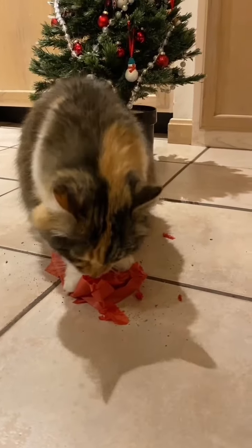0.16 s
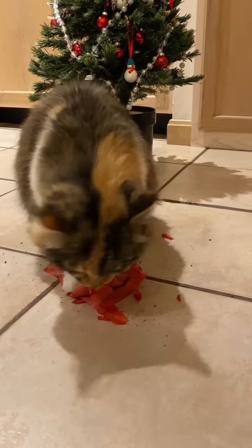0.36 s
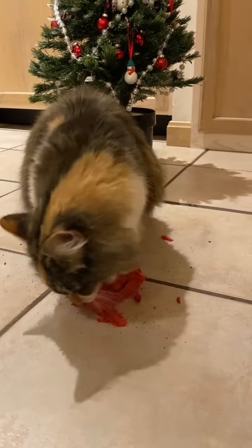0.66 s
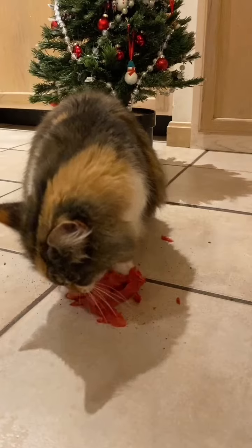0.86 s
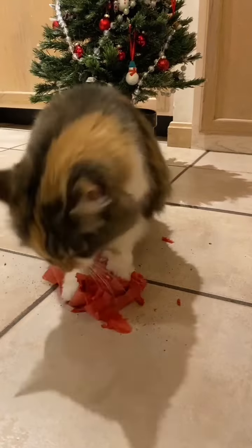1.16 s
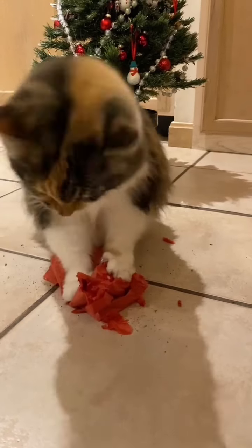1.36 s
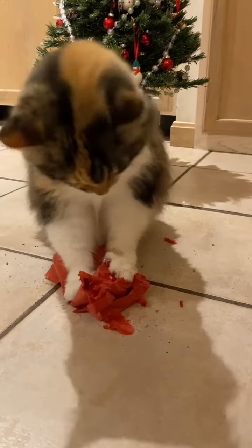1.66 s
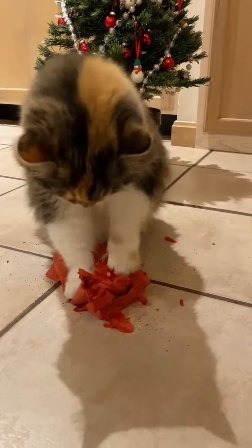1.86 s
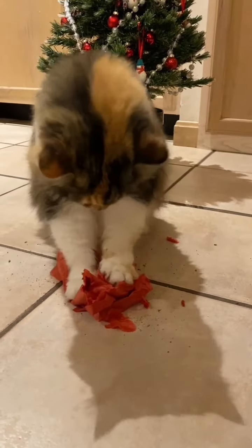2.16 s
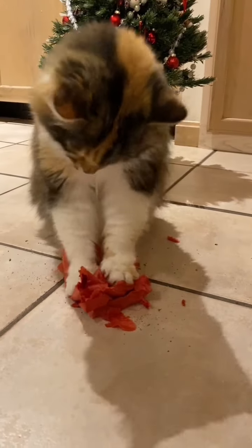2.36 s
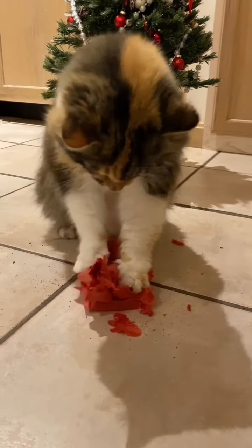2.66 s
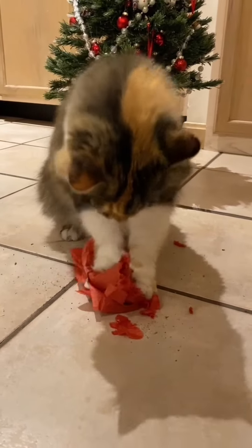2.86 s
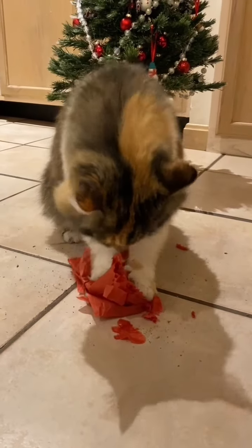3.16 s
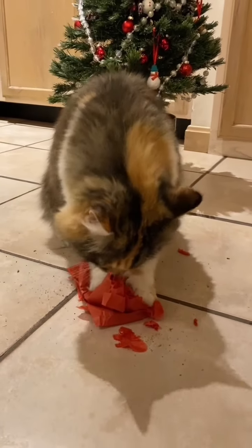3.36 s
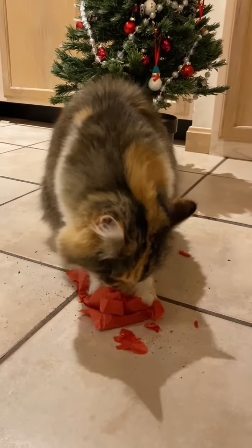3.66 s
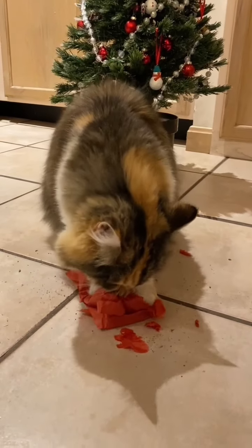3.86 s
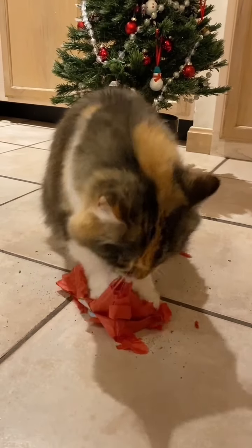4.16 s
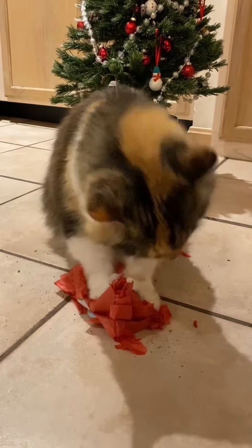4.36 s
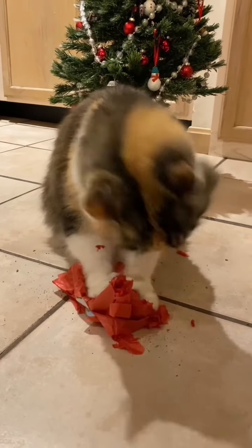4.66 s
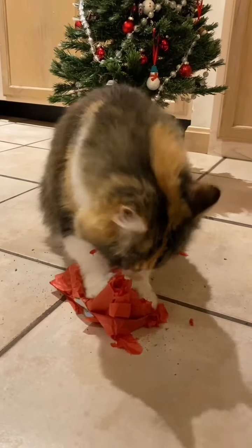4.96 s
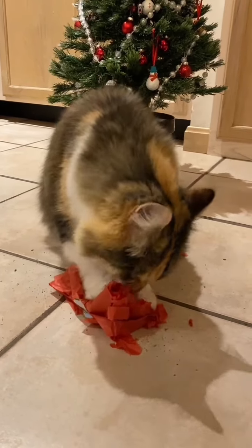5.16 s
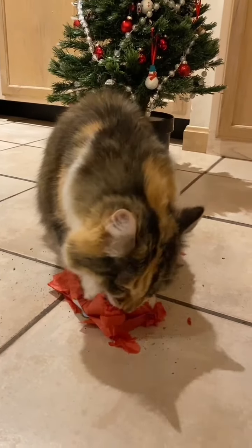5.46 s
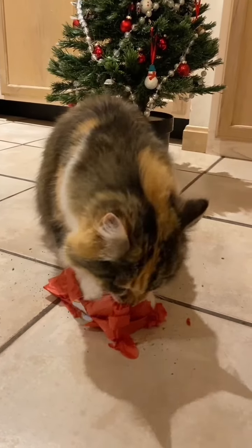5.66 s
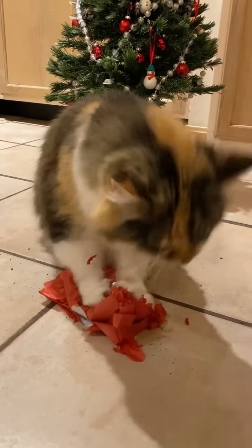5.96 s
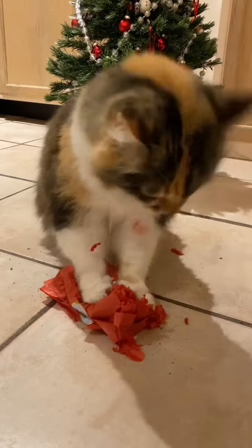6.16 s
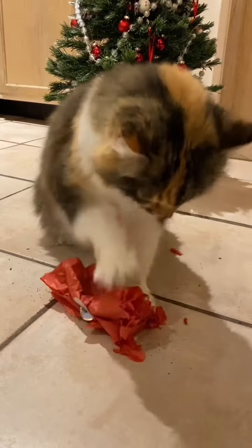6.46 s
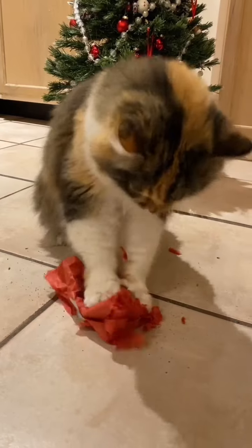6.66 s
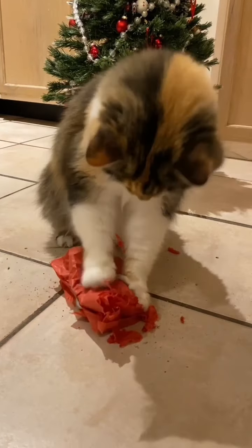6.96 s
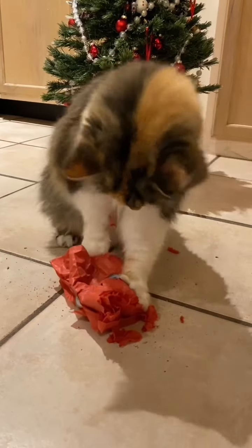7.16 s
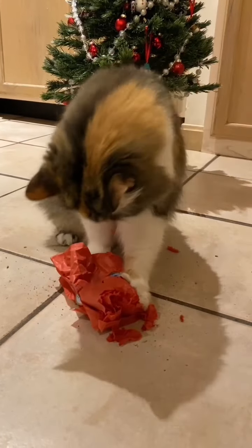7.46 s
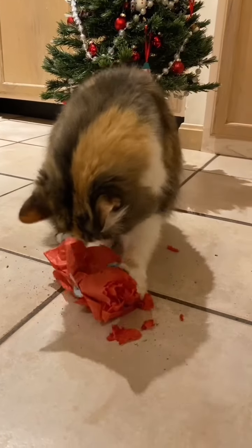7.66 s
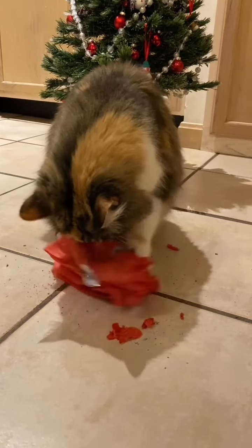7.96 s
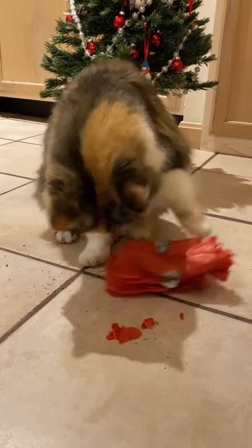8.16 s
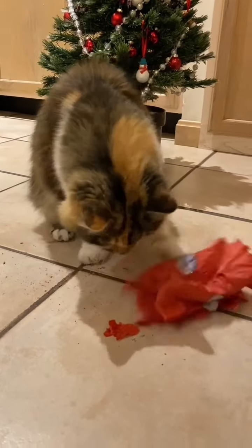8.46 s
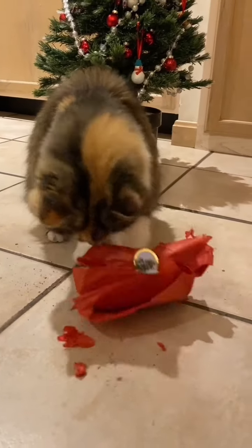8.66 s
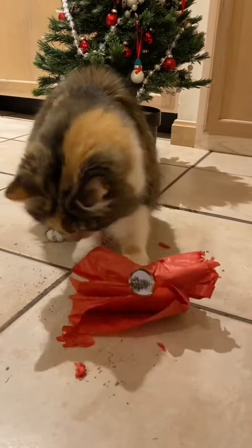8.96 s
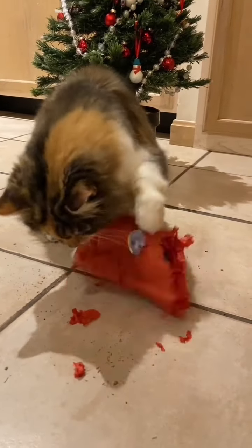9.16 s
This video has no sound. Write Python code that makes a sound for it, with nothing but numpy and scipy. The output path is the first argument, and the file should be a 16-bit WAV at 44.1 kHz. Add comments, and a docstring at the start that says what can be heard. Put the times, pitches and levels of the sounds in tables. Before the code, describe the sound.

Close, dry handling of thin crisp paper in a small tiled room. Irregular fine crackle and isolated crease snaps alternate with brief, loud, jerky rips and a few hollow pops. Quiet stretches leave only tiny ticks over soft household rumble. Padded thumps mark the hardest pulls. In the last two seconds the paper slides over the floor in several short rough swishes with light crackling.

```python
"""A cat kneads, bites and tears a small tissue-paper parcel on a tiled floor, near a camera, for 9.3 s.
From 0 s: low rumble with faint hum, and crinkling facets under resting and stroking paws; creases snap
as short rings with sharp edges, pockets pop with falling pitch, and soft bumps knock on the tiles.
Bites from 0.6, 3.6, 5.4 and 5.8 s swell; rips from 0.9 s are bursts of stick-slip plucks and fibre crackle.
From 7.5 s the parcel slides as grainy hiss. A short diffuse room response follows each paper sound."""
import sys
import numpy as np
from scipy import signal
from scipy.fft import rfft, irfft, next_fast_len
from scipy.io import wavfile
from scipy.ndimage import map_coordinates

SR = 44100
rng = np.random.default_rng(int(sys.argv[2]) if len(sys.argv) > 2 else 0)


def master(y):
    """Save y as 16-bit WAV."""
    cut = np.clip(np.atleast_2d(y).T, -1, 1)
    pcm = np.round(cut * 32767)  # scale
    wavfile.write(sys.argv[1], SR, pcm.astype(np.int16))


N = 411007

# Table levels are ahead of later gains and filters.
# pressed-wad spectrum: f/Hz, relative density/dB
WAD_SPECTRUM = [(80, -30), (200, -1), (480, -2.5), (650, 2.5), (900, -1), (1500, 0.5), (2200, -6),
                (4000, -23)]

WAD_DB = -1.5  # added to the wad in every push
ATTACK_DB_PER_S, RELEASE_DB_PER_S, SLIDE_ATTACK_DB_PER_S = 447, 230, 1500


def amp(db):
    """Decibels to gain."""
    return 10 ** (np.asarray(db) / 20)


def unit(x):
    """Scale to rms 1."""
    return x / np.sqrt(np.mean(x ** 2) + 1e-20)


def along(points, hz):
    """Read (f/Hz, value) points on a log-frequency axis."""
    f, v = np.transpose(points)
    return np.interp(np.log(hz + 1), np.log(f + 1), v)


def wobble(knots_per_s):
    """Smooth random curve through normally distributed knots."""
    knots = rng.standard_normal(int(N * knots_per_s / SR) + 4)
    return map_coordinates(knots, [np.arange(N) * knots_per_s / SR])


def filtered(x, response):
    """Apply a complex response of frequency."""
    size = next_fast_len(N + SR // 2)
    return irfft(rfft(x, size) * response(np.fft.rfftfreq(size, 1 / SR)), size)[..., :N]


def coloured(x, spectrum):
    """Causal minimum-phase filter of unit energy with the given spectrum shape."""
    size = 2048
    cepstrum = irfft(np.log(amp(along(spectrum, np.fft.rfftfreq(size, 1 / SR)))))
    # fold onto positive time
    cepstrum[1:size // 2] *= 2
    cepstrum[size // 2 + 1:] = 0
    pulse = irfft(np.exp(rfft(cepstrum)))
    return signal.oaconvolve(x, pulse / np.linalg.norm(pulse))[:N]


def diffuse(pair):
    """Two unrelated signals as close-set ports hear them: alike in the bass."""
    # stereo width: f/Hz, side minus mid/dB
    width = [(60, -39), (140, -28), (280, -9), (550, -2), (1000, 0.5), (1800, -11), (2800, -0.5),
             (6000, 16.5)]
    turn = lambda hz: np.arctan(amp(along(width, hz)))
    mid, side = filtered(pair, lambda hz: np.array([np.cos(turn(hz)), np.sin(turn(hz))]))
    return np.array([mid + side, mid - side])


def add(track, s, sound):
    """Mix a sound into the track at time s."""
    part = track[max(round(s * SR), 0):][:len(sound)]
    part += sound[:len(part)]


def crackle(rate_per_s, spread_db):
    """Random impulses of uneven size, scaled to mean power 1."""
    sizes = rng.choice([-1, 1], N) * amp(spread_db * np.clip(rng.standard_normal(N), -2, 2))
    return unit((rng.random(N) < rate_per_s / SR) * sizes / np.sqrt(rate_per_s))


def room_tone(rumble_db=-51.0, swing_db=0.7):
    """Household rumble and hiss, with a faint hum wavering in pitch and level."""
    # background spectrum: f/Hz, relative density/dB
    rumble = [(15, -41), (30, -9.5), (48, -4.5), (75, 1.5), (115, -4), (170, -4.5), (260, -16),
              (450, -19.5), (700, -23.5), (1200, -33.5), (3000, -37), (6000, -42), (10000, -77),
              (15500, -77)]
    # appliance hum: f/Hz, rms level/dB
    hum_lines = [(120, -72), (290, -70), (431, -73)]
    noise = rng.standard_normal((2, N))
    air = unit(diffuse(filtered(noise, lambda hz: amp(along(rumble, hz)))))
    t = np.arange(N) / SR
    waver_db, waver_rad = 3.5, 1.48
    hum = 0
    for hz, db in hum_lines:
        tone = np.sin(2 * np.pi * hz * t + waver_rad * wobble(9))
        hum = hum + amp(db) * unit(amp(waver_db * wobble(6.4)) * tone)
    return amp(rumble_db + swing_db * wobble(9)) * air + hum


def clock():
    """Times of the push-level curves, 1 ms apart."""
    return np.arange(0, N / SR, .001)


def held(t, s, length, attack_db_per_s):
    """Attack, hold and release of one push on the paper, in dB."""
    attack = -attack_db_per_s * np.maximum(s - t, 0)
    return attack - RELEASE_DB_PER_S * np.maximum(t - s - length, 0)


def strokes(table, attack_db_per_s):
    """One push per row: (level curve dB, wad offset dB, treble offset dB)."""
    t = clock()
    pushes = []
    for s, length, db, swell_db, wad_db, treble_db in table:
        swell = swell_db * (np.clip((t - s) / length, 0, 1) - .5)
        pushes.append((db + swell + held(t, s, length, attack_db_per_s), wad_db, treble_db))
    return pushes


def kneading():
    """Pushes that crinkle the paper: resting paws, strokes, and bites mounting to a final tug."""
    # paws press or shove: t/s, length/s, level/dB, swell over the stroke/dB,
    # wad offset from loose sheet/dB, treble offset from loose sheet/dB
    paw_strokes = [(0.352, 0.024, -51.5, 1, 4.5, -4.5), (0.493, 0.072, -57, 9, 7, -5),
                   (0.862, 0.079, -48, 4, 8.5, -3), (1.02, 0.017, -43.5, -2, 9.5, -10),
                   (1.142, 0.18, -62, -5.5, -11, -2), (1.452, 0.18, -64, -3, -16, -18),
                   (1.793, 0.072, -50, 9.5, -1, -6), (1.981, 0.27, -52, -1.5, -2.5, -4.5),
                   (2.294, 0.19, -55.5, -0.5, -3.5, -25), (2.466, 0.18, -43.5, 0, -2, -4.5),
                   (2.679, 0.041, -37.5, -2.5, -3, -1), (2.74, 0.044, -47, 2, -2, -8),
                   (2.813, 0.039, -40.5, 6, 1, 0), (2.89, 0.065, -49.5, 6.5, -4.5, -5),
                   (3.02, 0.16, -56, -1, -1.5, -7), (3.141, 0.042, -47.5, 0, 1.5, -5),
                   (3.227, 0.15, -50, -0.5, -3.5, -6.5), (3.397, 0.18, -54.5, 5.5, 1, -6.5),
                   (3.846, .1, -55, -3, 2, -7), (3.958, 0.092, -47.5, 16, 6, -2),
                   (4.359, 0.023, -57.5, -4, 0, 0.5), (4.458, 0.1, -57.5, -4, -1.5, -4.5),
                   (4.69, .13, -59, 0, 0.5, -9), (4.975, 0.19, -66, 16, 4, -6),
                   (5.22, 0.13, -56, 3.5, 3.5, -5.5), (5.6, 0.067, -47, 4, 6, 2),
                   (5.72, 0.015, -44, -3.5, 1, 1), (5.847, .26, -56.5, 9.5, 0.5, -3),
                   (6.255, 0.053, -49, 8.5, 1, -3.5), (6.398, 0.044, -66, 13, 0, -10),
                   (6.495, 0.033, -47, 2.5, 2, 0.5), (6.565, 0.076, -45.5, 5.5, -3, -3.5),
                   (6.789, 0.18, -55, 11.5, -1, -5), (7.12, 0.094, -53.5, 2, -2.5, -2.5),
                   (7.368, 0.19, -61, 11, -5.5, -3), (8.468, 0.028, -45, 1, 1.5, 0),
                   (8.538, 0.042, -43, 3, -6, 0), (9.072, 0.073, -47.5, 2.5, 0.5, .5),
                   (9.27, 0.039, -40, 4.5, 1.5, -1.5)]
    # teeth grip and pull: t/s, length/s, level at the grip/dB, gain by the final tug/dB
    bites = [(0.571, 0.52, -49, 10), (3.625, 0.48, -51.5, 15.5), (5.379, 0.28, -54, 7),
             (5.782, 0.051, -48.5, 8.5)]
    rest_db, rest_wad_db, rest_treble_db, fidget_db = -68.5, 1, 0.5, 2.5
    tug_s, bite_wad_db, bite_treble_db = 0.12, 4, -1.5
    t = clock()
    fidget = np.interp(t, np.arange(N) / SR, wobble(10))
    pushes = [(rest_db + fidget_db * fidget, rest_wad_db, rest_treble_db)]
    pushes += strokes(paw_strokes, ATTACK_DB_PER_S)
    for s, length, db, tug_db in bites:
        tug = tug_db * np.exp(np.minimum(t - s - length, 0) / tug_s)
        level = db + tug + held(t, s, length, ATTACK_DB_PER_S)
        pushes.append((level, bite_wad_db, bite_treble_db))
    return pushes


def summed(pushes):
    """Levels in dB of loose sheet, pressed wad and sheet treble; pushes add in power."""
    sheet = sum(amp(level) ** 2 for level, _, _ in pushes)
    wad = sum(amp(level + wad_db + WAD_DB) ** 2 for level, wad_db, _ in pushes)
    treble = sum(amp(level + treble_db) ** 2 for level, _, treble_db in pushes)
    t = np.arange(N) / SR
    return [np.interp(t, clock(), 10 * np.log10(power + 1e-20)) for power in (sheet, wad, treble)]


def blend(sheet, wad, levels):
    """Colour the loose sheet and pressed wad, and play them at their levels."""
    # loose-sheet spectrum: f/Hz, relative density/dB
    sheet_spectrum = [(500, -20.5), (1300, -6.5), (2100, 1), (2700, -1), (3300, 2.5), (4400, -1), (5500, 1),
                      (8000, -4.5), (11000, -5.5), (15500, -13)]
    treble_hz = 5200  # the finest wrinkles sound above this
    sheet_db, wad_db, treble_db = levels
    sheet = coloured(unit(sheet), sheet_spectrum)
    fine = filtered(sheet, lambda hz: hz ** 4 / (hz ** 4 + treble_hz ** 4))
    pressed = coloured(unit(wad), WAD_SPECTRUM)
    return amp(sheet_db) * (sheet - fine) + amp(treble_db) * fine + amp(wad_db) * pressed


def facets(rate, spread_db, sharpness):
    """Facets of many sizes buckle independently and ring briefly; small ones are most numerous."""
    out = np.zeros(N)
    for hz in 400 * 2 ** (np.arange(11) / 2):
        buckles = crackle(rate * (1 + (hz / 3500) ** 2), spread_db)
        out += np.sqrt(hz) * signal.lfilter(*signal.iirpeak(hz, max(sharpness, 1), SR), buckles)
    return unit(out)


def flurries(rate_per_s, life_s):
    """Power of mean 1 that jumps at random moments and decays exponentially."""
    jumps = crackle(rate_per_s, spread_db=4) ** 2
    power = signal.lfilter([1], [1, -np.exp(-1 / (life_s * SR))], jumps)
    return power / power.mean()


def handling(gain_db=0, slide=0.76, slide_grows=0.046):
    """Harder kneading buckles more facets a second; a light touch leaves separate crackles."""
    flurries_per_s, flurry_s, flurry_share = 110, .0014, .36  # share of crinkle power
    levels = summed(kneading())
    rate = 105 * amp(.65 * (levels[0] + 55.5))
    # sheet sliding on sheet thins below -67 dB
    hiss = slide * amp(slide_grows * np.minimum(levels[0] + 67.0, 0))
    # paper catches and lets go
    catching = np.sqrt(1 - flurry_share + flurry_share * flurries(flurries_per_s, flurry_s))
    sheet = facets(rate, spread_db=5, sharpness=4) + hiss * rng.standard_normal(N)
    sheet += 0.72 * crackle(5 * rate, spread_db=-1.5)
    wad = facets(rate, spread_db=8.0, sharpness=2.7) + 0.63 * hiss * rng.standard_normal(N)
    return amp(gain_db) * catching * blend(sheet, wad, levels)


def ticks():
    """Faint creases settling at random, as rows like those of the louder snaps."""
    ticks_per_s, tick_db, spread_db = 24, -54, 5
    tick_hz, spread_octaves, edge_re_peak_db = 2780, 0.8, -10
    count = int(ticks_per_s * N / SR)
    when, size, pitch = rng.random((count, 3)).T
    db = tick_db + spread_db * (2 * size - 1)
    hz = tick_hz * 2 ** (spread_octaves * (2 * pitch - 1))
    return list(zip(when * N / SR, db, hz, db + edge_re_peak_db))


def snaps(edge_life_s=0.0011, edge_gain_db=-5, facet_gain_db=4.5, count=4):
    """A crease flips: a facet swells and rings, its edge cracks, and neighbouring facets follow."""
    # louder creases: t/s, facet level/dB, f/Hz, edge level/dB
    loud_snaps = [(0.033, -41.5, 3140, -57), (0.082, -42, 2430, -60), (0.2014, -36, 2400, -57),
                  (.258, -49, 3000, -58), (0.2864, -65, 5900, -48), (0.375, -38, 1540, -44),
                  (0.465, -55, 2990, -55), (.4985, -45, 1400, -62), (0.533, -52, 5230, -43),
                  (.581, -48, 5000, -40), (.599, -38, 1900, -39), (.647, -29, 1000, -39),
                  (0.67, -45, 5940, -44), (0.7306, -52, 5500, -45), (0.8335, -32, 1200, -47),
                  (.8424, -45, 3000, -47), (.8802, -40, 2000, -47), (.8921, -36, 3000, -46),
                  (1.032, -23, 2200, -37), (1.0703, -28, 950, -36), (1.0812, -16, 1200, -30),
                  (1.084, -12, 950, -31), (1.1708, -43, 3200, -56), (1.26, -45, 2554, -60),
                  (1.27, -41, 2260, -48), (1.297, -53, 3400, -54), (1.3676, -45, 3570, -59),
                  (1.454, -45, 1530, -57), (1.538, -42, 3550, -52), (1.5556, -36, 2720, -60),
                  (1.597, -42, 2610, -64), (1.6225, -39, 2860, -62), (1.622, -41, 1510, -62),
                  (1.833, -41, 3390, -49), (1.8365, -41, 1400, -55), (1.9367, -41, 2030, -44.5),
                  (1.9648, -47, 5340, -40), (2.0044, -43.5, 3500, -46), (2.061, -48, 1500, -52),
                  (2.1382, -34, 1770, -58), (2.1789, -43, 2200, -55), (2.2154, -31, 2010, -42),
                  (2.327, -41, 2800, -64), (2.429, -32.5, 2640, -48), (2.4797, -47, 3000, -43),
                  (2.5198, -37, 3000, -48), (2.5376, -35, 1900, -41), (2.548, -34, 4370, -48),
                  (2.596, -30, 1840, -50), (2.6789, -24, 2000, -39), (2.6868, -12, 2400, -26),
                  (2.7084, -21, 1790, -38), (2.7768, -30, 2120, -46), (2.807, -36, 5500, -41),
                  (2.811, -34, 4600, -39), (2.9513, -43, 3200, -54), (3.158, -36, 1600, -52),
                  (3.1966, -40, 3000, -54), (3.2473, -43, 1400, -58), (3.2818, -41, 1500, -57),
                  (3.3207, -30.5, 2220, -38.5), (3.3402, -31.5, 5240, -45), (3.369, -43, 3500, -51),
                  (3.456, -44, 1800, -47), (3.4812, -43, 3300, -52), (3.504, -41, 2200, -51),
                  (3.635, -40, 1300, -55), (3.65, -35, 1370, -41), (3.67, -34, 1400, -48),
                  (3.7515, -28, 1520, -57), (3.8498, -40, 1300, -51), (3.9478, -22.5, 1150, -40),
                  (3.9651, -38, 1200, -46), (4.091, -13, 1000, -42), (4.1015, -15, 800, -45),
                  (4.116, -17, 800, -44), (4.1253, -19, 700, -39), (4.271, -55.5, 3000, -54.5),
                  (4.379, -34.5, 2360, -54.5), (4.461, -42.5, 1240, -52), (4.656, -50, 3200, -64),
                  (4.6645, -28, 3100, -57), (4.828, -41, 3060, -51), (4.914, -55, 5050, -59),
                  (5.0165, -60, 5870, -50), (5.331, -37, 1400, -56), (5.37, -41, 1440, -42),
                  (5.384, -36, 1340, -38), (5.3997, -44, 3500, -46), (5.425, -37, 1160, -44),
                  (5.436, -41, 2070, -44), (5.5415, -48, 1300, -52), (5.5511, -48, 4000, -47),
                  (5.59, -36, 1800, -50), (5.631, -27, 930, -50), (5.682, -31, 1400, -37),
                  (5.7098, -26, 5800, -37), (5.725, -19.5, 1490, -38), (5.7863, -24, 1550, -40),
                  (5.7975, -32, 2500, -37), (5.8128, -15, 1500, -37), (5.8208, -10, 2300, -38),
                  (5.8344, -22, 1000, -40), (6.0058, -37, 4720, -51), (6.04, -29, 2620, -55),
                  (6.1197, -38, 3280, -62), (6.2174, -42, 5170, -45), (6.3157, -30, 1860, -40.5),
                  (6.381, -38, 4200, -63), (6.3822, -43, 2400, -63), (6.461, -44, 5900, -48),
                  (6.5095, -29, 2190, -40), (6.544, -44, 3200, -48), (6.5729, -38, 4200, -47),
                  (6.5839, -34, 1400, -54), (6.6142, -30, 2300, -39), (6.6205, -24, 3300, -36),
                  (6.648, -40, 2500, -48), (6.802, -40, 2310, -62), (6.936, -40, 3500, -45),
                  (6.9672, -40, 2400, -43), (7.0499, -37, 5770, -46.5), (7.113, -28, 1550, -35.5),
                  (7.196, -48, 3500, -55), (7.222, -35.5, 2520, -47), (7.4052, -50, 5470, -50.5),
                  (7.6827, -42, 3500, -54), (7.688, -33, 5730, -48), (7.816, -34, 4740, -56),
                  (8.329, -49, 2200, -59), (8.342, -50, 3550, -42), (8.372, -42, 3000, -42),
                  (8.4591, -36, 3280, -46), (8.54, -29, 3000, -47), (8.56, -32, 1600, -48),
                  (9.073, -31, 1510, -57), (9.2887, -29, 2630, -40)]
    # sharp-edge spectrum: f/Hz, relative density/dB
    edge_spectrum = [(300, -29), (1500, 4.5), (4500, -1), (7000, 6.5), (11000, 0), (15000, -0.5)]
    swell_s, ring_s, hard_snap_db = 0.00021, 0.00048, -21  # twice as quick at hard_snap_db
    rebound_s, rebound_db, rebound_octaves = .003, -15, .45  # mean gap, level, pitch scatter scale
    half_s, edge_lead_s = .004, .0003
    out, edges, t = np.zeros(N), np.zeros(N), np.arange(-half_s, half_s, 1 / SR)
    for s, db, hz, edge_db in loud_snaps + ticks():
        age = t * (1 + amp(db - hard_snap_db))
        shape = np.exp(-np.logaddexp(-age / swell_s, age / ring_s))
        swing = lambda pitch: shape * np.sin(2 * np.pi * (pitch * t + rng.random()))
        add(out, s - half_s, amp(db) * swing(hz))
        for delay in np.cumsum(2 * rebound_s * rng.random(count)):
            level = amp(db + rebound_db) * np.exp(-delay / (count * rebound_s))
            pitch = hz * 2 ** (rebound_octaves * rng.uniform(-1.5, 1))
            add(out, s - half_s + delay, level * swing(pitch))
        crack = unit(np.exp(-(t + half_s) / edge_life_s) * rng.standard_normal(len(t)))
        add(edges, s - edge_lead_s, amp(edge_db + edge_gain_db) * crack)
    return amp(facet_gain_db) * out + coloured(edges, edge_spectrum)


def pops(gain_db=0):
    """A pocket of the wad gives way with a crunch; its pitch drops as it slackens."""
    # hollow pops: t/s, level/dB, nominal f/Hz (glides from 2.45 toward 0.25 times this)
    pop_rows = [(.0425, -47, 800), (.711, -39, 750), (.8635, -28.5, 680), (1.877, -41, 800),
                (2.3495, -37, 1250), (2.4995, -39, 1200)]
    life_s, glide_s, crunch, crunch_life_s = .001, .002, .25, .005
    out, t = np.zeros(N), np.arange(SR // 30) / SR
    for s, db, hz in pop_rows:
        pitch = hz * (0.25 + 2.2 * np.exp(-t / glide_s))
        swell = t / life_s * np.exp(1 - t / life_s)
        pocket = swell * np.sin(2 * np.pi * np.cumsum(pitch) / SR)
        noise = np.exp(-t / crunch_life_s) * rng.standard_normal(len(t))
        folds = coloured(noise, WAD_SPECTRUM)[:len(t)]
        add(out, s, amp(db + gain_db) * (pocket + crunch * folds))
    return out


def knocks(life_s=0.0017):
    """Padded contacts of paws and parcel with the floor: dull, short, damped bumps."""
    # soft knocks: t/s, level/dB, f/Hz
    knock_rows = [(.375, -38, 352), (1.088, -30.5, 217), (1.108, -31, 142), (2.473, -34.5, 374),
                  (2.495, -38.5, 272), (2.692, -34.5, 234), (4.103, -28, 416), (4.114, -22.5, 430),
                  (4.125, -33, 233), (4.138, -37, 302), (5.823, -31, 175), (6.945, -43, 450),
                  (8.487, -36, 600), (8.561, -40, 288), (9.274, -37, 237)]
    out, t = np.zeros(N), np.arange(SR // 20) / SR
    swell = t / life_s * np.exp(1 - t / life_s)
    for s, db, hz in knock_rows:
        add(out, s, amp(db) * swell * np.sin(2 * np.pi * (hz * t + rng.random())))
    return out


def slips():
    """Impulses of a tear's edge as it sticks and slips, at uneven gaps."""
    slips_per_s, gap_log_scatter, size_scatter_db = 520, .6, 3
    count = int(slips_per_s * N / SR)
    gap, size = np.clip(rng.standard_normal((count, 2)), -2, 2).T
    when = np.cumsum(np.exp(gap_log_scatter * gap))
    index = (when / when[-1] * (N - 1)).astype(int)
    return np.bincount(index, rng.choice([-1, 1], count) * amp(size_scatter_db * size), N)


def rips(rise_s=0.00076, fall_s=0.0049):
    """A tear runs in jerks: fibres part in a dense crackle and the taut sheet is plucked."""
    # tear jerks and hard crushes: t/s, length/s, taut-sheet level/dB, fibre level/dB
    rip_rows = [(0.929, 0.0059, -34.5, -42), (0.949, 0.019, -31.5, -40.5), (1.02, 0.012, -41, -39),
                (1.067, 0.0022, -22.5, -37), (1.077, 0.025, -36.5, -32), (2.688, 0.0022, -39, -30),
                (2.696, 0.026, -48, -40), (4.058, 0.027, -39.5, -35.5), (4.089, 0.034, -30.5, -37),
                (5.736, 0.018, -38.5, -39.5), (5.808, 0.0052, -26.5, -29.5), (5.817, 0.0046, -26.5, -28),
                (5.83, .0036, -34, -38), (6.494, 0.019, -45, -39.5), (6.941, 0.0039, -40, -37),
                (7.099, 0.011, -49, -45), (8.539, 0.035, -45, -51), (9.273, 0.018, -47, -39)]
    # taut-sheet spectrum: f/Hz, relative density/dB
    taut_spectrum = [(60, -28), (170, -6), (320, -6), (470, -1), (620, 4), (850, 3.5), (1400, 2),
                     (2200, -3), (4000, -19), (9000, -16)]
    # parting-fibre spectrum: f/Hz, relative density/dB
    fibre_spectrum = [(600, -31), (1500, 1.5), (2100, 0), (2700, -7.5), (3400, 3), (4400, -1.5),
                      (6000, -0.5), (10000, -5), (15500, -16)]
    after_s = .015
    plucks = coloured(slips(), taut_spectrum)
    fibres = coloured(crackle(3500, spread_db=5), fibre_spectrum)
    out = np.zeros(N)
    for s, length, taut_db, fibre_db in rip_rows:
        t = np.arange(int((length + after_s) * SR)) / SR
        pull = (1 - np.exp(-t / rise_s)) * np.exp(-np.maximum(t - length, 0) / fall_s)
        index = round(s * SR) + np.arange(len(t))
        burst = lambda x: unit(pull * np.take(x, index, mode="wrap")) * np.sqrt(length / t[-1])
        add(out, s, amp(taut_db) * burst(plucks) + amp(fibre_db) * burst(fibres))
    return out


def sliding(gain_db=0, grains_per_s=9000, waver_db=0.94):
    """Paper dragged over tile catches on countless tiny bumps: a fairly even hiss, quick to start."""
    # slides: t/s, length/s, level/dB, swell over the slide/dB,
    # wad offset from loose sheet/dB, treble offset from loose sheet/dB
    slide_rows = [(7.55, .12, -54, 5.5, -3, 3.5), (7.69, 0.3, -54.5, -4.5, -4, 0.5),
                  (7.975, 0.17, -54.5, 2.5, -3.5, 2.5), (8.175, 0.14, -65, -12, -9, 8.5),
                  (8.328, 0.11, -54.5, -1, -1, 4), (8.442, 0.15, -51, -3.5, -1.5, 3),
                  (8.63, 0.4, -62, -21, -3, 4), (9.08, 0.066, -51.5, -1, -2, 3),
                  (9.19, 0.079, -60, 16, -5, 11.5)]
    levels = summed(strokes(slide_rows, SLIDE_ATTACK_DB_PER_S))
    sheet, wad = crackle(grains_per_s, spread_db=3.5), crackle(grains_per_s, spread_db=2.5)
    return amp(gain_db + waver_db * wobble(30)) * blend(sheet, wad, levels)


def bending(hz, lag_s=0.00111):
    """Bending waves cross paper faster at high pitch, so every click is a tiny falling chirp."""
    reference_hz = 1000
    # group delay: lag_s * (sqrt(reference_hz / hz) - 0.5)
    return np.exp(-2j * np.pi * lag_s * (2 * np.sqrt(reference_hz * hz) - hz / 2))


def corner(hz):
    """Gain of the floor-cupboard corner, which resonates in a few narrow bands."""
    # corner resonances: f/Hz, width/Hz, level/dB
    resonances = [(430, 25, -9), (494, 46, -4), (850, 49, -5.5), (956, 70, -1), (1230, 47, -16),
                  (1453, 83, -12.5), (2140, 110, -10), (3140, 360, -18.5), (4990, 63, -6.5)]
    gain = 1
    for centre, width, db in resonances:
        damping = 1j * hz * width
        gain = gain + amp(db) * damping / (centre ** 2 - hz ** 2 + damping)
    return gain


def kitchen(x, early_db=8, early_life_s=0.013):
    """Tiles and cupboards return a dense early cluster and short tail, redrawn every 0.25 s."""
    # room decay: f/Hz, T60/s
    decay = [(200, 0.26), (1000, 0.053), (4000, 0.16), (14000, 0.074)]
    size = SR // 4
    wet = np.zeros((2, N))
    for start in range(0, N, size):
        hz, t, z = signal.stft(rng.standard_normal((2, 2 * size)), SR, nperseg=256)
        fade = amp(-60 * t / along(decay, hz)[:, None])
        tail = signal.istft(z * fade, SR, nperseg=256)[1]
        t = np.arange(tail.shape[1]) / SR
        tail *= amp(early_db * np.exp(-t / early_life_s)) * (1 - np.exp(-t / 0.00049))
        for port, echo in zip(wet, tail):
            echo = echo / np.linalg.norm(echo)
            add(port, start / SR, signal.fftconvolve(x[start:start + size], echo))
    return diffuse(wet)


def scene(direct_db=-2.0):
    """Parcel sound reaches two ports at different phases, followed by the room, over room tone."""
    # left-port phase lead: f/Hz, phase/rad
    lead = [(250, 0), (500, -.2), (800, 0), (1900, 0), (2800, .6), (3500, .2), (4400, .7), (5200, .2),
            (7500, 3.2), (10400, 6.25), (13800, 9.45), (15600, 12.3)]
    room_db = -7.5  # re direct
    paper = filtered(handling() + sliding() + rips() + snaps(), bending)
    parcel = filtered(paper + pops() + knocks(), corner)
    direct = filtered(parcel, lambda hz: np.exp(.5j * np.outer([1, -1], along(lead, hz))))
    return amp(direct_db) * (direct + amp(room_db) * kitchen(parcel)) + room_tone()


def record(dry):
    """The camera thins the deepest bass and keeps nothing above its band limit."""
    bass_hz, top_hz = 30, 15850
    return filtered(dry, lambda hz: (hz < top_hz) * hz ** 4 / (hz ** 4 + bass_hz ** 4))


dry = scene()
out = record(dry)
master(out)
```